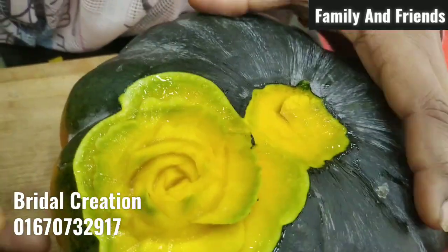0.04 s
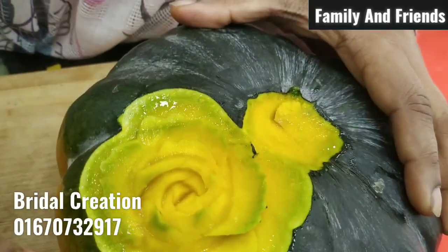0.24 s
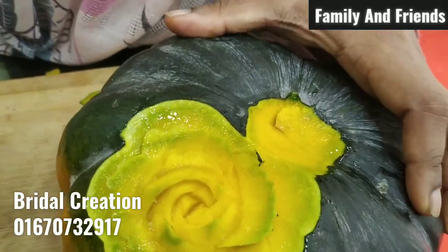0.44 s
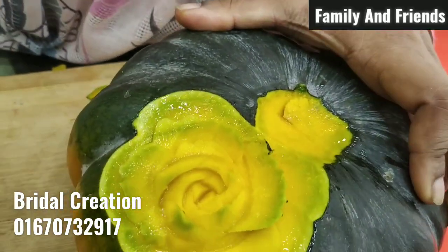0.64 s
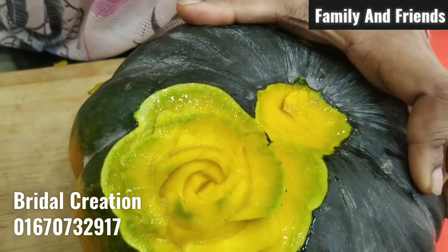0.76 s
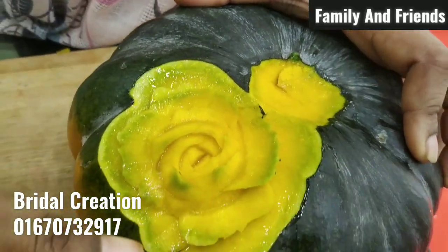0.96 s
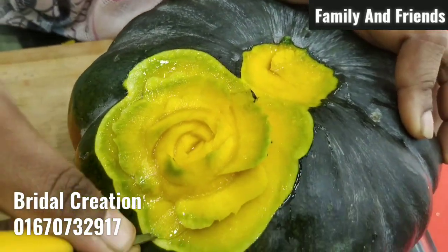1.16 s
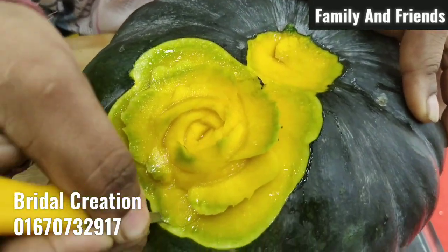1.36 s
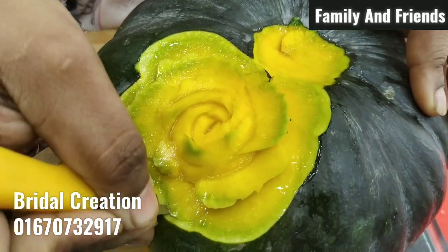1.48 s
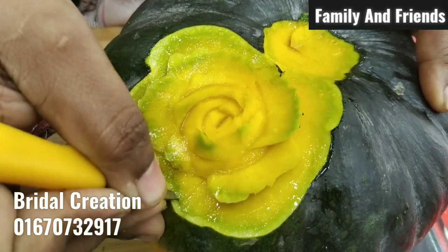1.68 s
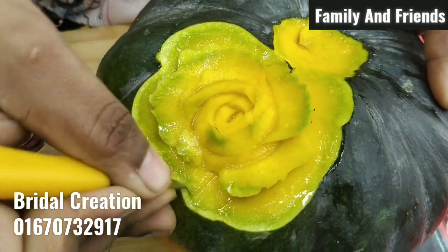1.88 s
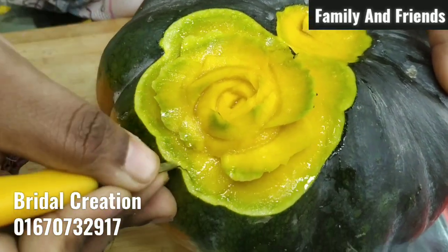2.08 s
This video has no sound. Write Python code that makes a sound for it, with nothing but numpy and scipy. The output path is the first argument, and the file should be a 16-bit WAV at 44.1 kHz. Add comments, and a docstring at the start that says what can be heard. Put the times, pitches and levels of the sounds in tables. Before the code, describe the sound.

A small knife carves a pumpkin indoors, close to the microphone. The rind first swishes and judders as it is turned, then crisp cutting ticks come quickly and slow down, ending with dull bumps and knocks on a wooden board.

```python
"""A small knife carves a pumpkin on a wooden board indoors, close to a hand-held stereo microphone.
Soft room noise, faint hum and left-side handling rumble run throughout.
First the fruit is turned: low stick-slip judder, dry swish of the rind.
From 0.64 s, crisp ticks, each a few ms of crackle, quick at first, then slowing.
From 1.4 s, as the knife hand goes in: dull bumps on the left, then woody knocks and three last ticks."""
import sys
import numpy as np
from scipy import signal
from scipy.fft import rfft, irfft, next_fast_len
from scipy.io import wavfile

SR = 44100
rng = np.random.default_rng(int(sys.argv[2]) if len(sys.argv) > 2 else 0)


def to_wav(sig):
    """Store sig (one row per channel, or 1-D mono) as 16-bit WAV at the path in sys.argv[1].

    Samples outside -1..1 are clipped; the rate is SR.
    """
    pcm = np.clip(np.atleast_2d(sig), -1, 1) * 32767
    pcm = np.round(pcm).astype(np.int16)
    wavfile.write(sys.argv[1], SR, pcm.T)  # frames by channels


N = 93315
T = np.arange(N) / SR
FFT_SIZE, TICK_SAMPLES = 2 * next_fast_len(N // 2 + 4096), 2048

ROOM_NOISE_EQ = [(20, -19), (40, -6.5), (65, 5), (115, -8.5), (155, -7), (195, -16.5), (280, -14),
                 (385, -17.5), (480, -22), (750, -25), (1200, -31), (2200, -31.5), (4000, -34),
                 (7000, -40.5), (15500, -42)]  # background spectrum: f/Hz, gain/dB
ROOM_COHERENCE = [(50, 0.027), (130, 0.64), (300, 0.93), (650, 0.51), (1400, 0), (8000, 0)]  # background, left to right: f/Hz, correlation
HUM_TONES = [(155, -60.5), (229, -71.5), (382, -68)]  # room hum: f/Hz, level/dB
RUMBLE_LEVEL = [(0, -41.5), (.25, -32.5), (.6, -36.5), (.8, -38), (.92, -29.5), (1.1, -36.5), (1.35, -34.5),
                (1.55, -33.5), (1.75, -36), (1.8, -24.5), (2.04, -26), (2.12, -40)]  # handling rumble: t/s, level/dB
RUMBLE_EQ = [(15, 1.5), (33, 2), (60, -8.5), (100, -19), (160, -28.5), (300, -38), (700, -51),
             (2000, -64.5)]  # rumble spectrum: f/Hz, gain/dB

SLIP_RUNS = [(.045, 0.043, 82, -36), (0.272, 0.207, 77.5, -39.5)]  # judders of the fruit: t/s, length/s, slip rate/Hz, level/dB
SLIP_EQ = [(30, -17), (78, 1.5), (155, -13), (235, -19.5), (380, -21.5), (700, -31), (1500, -51)]  # spectrum of one slip: f/Hz, gain/dB
RIND_SWISHES = [(.067, 0.0035, 0.0033, 0.64, -45), (.094, 0.0057, 0.015, 0.55, -36)]  # opening swishes: t/s, attack/s, hold/s, t60/s, level/dB
SWISH_EQ = [(300, -17), (600, 2.5), (1150, -8.5), (1500, 1), (2200, -1), (3100, -5), (5000, 1), (8000, 1.5),
            (11000, 2.5), (16000, 1.5)]  # swish spectrum: f/Hz, gain/dB
RUB_LEVEL = [(0, -76), (.06, -73), (.16, -72), (.22, -65), (.312, -59), (.33, -58.5), (.38, -50),
             (.45, -54.5), (.5, -51), (.58, -64), (.63, -63), (.9, -64), (1.0, -70), (1.1, -66.5),
             (1.35, -70.5), (2.12, -60.5)]  # rind sliding under the hands: t/s, level/dB
RUB_CATCHES = [(.319, -46), (0.496, -60)]  # rub catching afresh: t/s, level/dB
RUB_EQ = [(500, -40), (1300, 5), (2200, 2), (3300, -13), (5000, 11.5), (6500, 7), (8500, 12), (12000, 8.5),
          (16000, 6.5)]  # rub spectrum: f/Hz, gain/dB
BRUSH_LEVEL = [(0, -87), (.6, -61), (.72, -72), (.95, -58.5), (1.04, -60), (1.12, -69), (1.17, -57),
               (1.28, -56.5), (1.33, -80), (2.12, -69)]  # thin high brushing: t/s, level/dB
BRUSH_EQ = [(4000, -20), (6500, -30), (9000, 2.5), (12500, 2), (16000, -3.5)]  # brushing spectrum: f/Hz, gain/dB

# ticks: t/s, length/s, relative level/dB, ring f/Hz, then gains: ring/dB, treble/dB, left/dB, snap/dB, body/dB
KNIFE_TICKS = [(0.6397, 0.01, -52, 5400, -6, 8, -7, -15, -32),
               (0.6772, 0.0073, -38, 5440, -5, -2, -2, -5, -22),
               (0.7154, 0.0049, -31.5, 6000, 3, -6.5, -0.5, -0.5, -25),
               (.7680, 0.0057, -30.5, 6140, 4, -2.5, -1.5, 1.5, -12),
               (0.8371, 0.0044, -25, 6400, -0.5, -5.5, 0, -6, -13),
               (0.9199, 0.0051, -28, 6660, 0, 1, -2, 0.5, -11.5),
               (1.0256, 0.0054, -25, 6660, -8, -2.5, -2.5, -7, -16),
               (1.2838, 0.0033, -32, 3980, -4.5, 4, 2, -20, -19),
               (1.5423, 0.0062, -29, 4020, -9.5, 0, -2.5, -5, -17),
               (1.8333, .0040, -29.5, 4300, -19, 2.5, 4, -1, -12.5),
               (1.9000, 0.0037, -30, 4970, -5, 0.5, 0, -5.5, -19),
               (1.944, 0.0056, -30.5, 4520, -2.5, -2, 1.5, -15, -13)]
HOLLOW_MODES = [(1724, -12, .016), (1830, -36, 0.0023)]  # hollow modes struck by each snap: f/Hz, gain/dB, t60/s
FRUIT_MODES = [(285, -4.5, 0.0087), (464, -5.5, 0.022), (890, -25, 0.0034)]  # low body of the fruit, same snap: f/Hz, gain/dB, t60/s
CRACKLE_EQ = [(300, -18), (1000, -11), (1800, -18.5), (2800, -18.5), (3300, -12), (3950, -3.5), (5000, -3),
              (7000, 0), (9000, -3.5), (11000, 0), (15500, -2)]  # crackle spectrum: f/Hz, gain/dB
TAIL_EQ = [(400, -4), (1800, 4), (3400, -10), (4300, 7.5), (5500, -1), (8000, -1.5), (15000, -2)]  # room tail spectrum: f/Hz, gain/dB
LEFT_EQ = [(500, 0), (1800, -1), (3000, 1), (4500, 1.5), (6300, -1), (8000, -5.5), (10500, -13.5),
           (13000, -18), (15500, -23)]  # dulled treble at the left microphone: f/Hz, gain/dB

HAND_BUMPS = [(1.403, -16.5, 57.4), (1.435, -20.5, 92), (1.782, -14.5, 56), (1.804, -17.5, 44),
              (1.889, -12, 41), (1.955, -13, 53.7), (2.009, -13, 48), (2.066, -20.5, 67.5)]  # handling bumps: t/s, envelope peak/dB, f/Hz
BOARD_KNOCKS = [(1.833, -45), (1.875, -39), (1.883, -47), (1.950, -42), (1.973, -47.5), (2.005, -49)]  # fruit on the board: t/s, level/dB
KNOCK_EQ = [(80, 2), (170, 4.5), (400, -6), (700, -10.5), (1100, -23), (3000, -38), (8000, -43)]  # knock spectrum: f/Hz, gain/dB


def from_db(db):
    """dB to gain."""
    return 10 ** (np.asarray(db) / 20)


def unit_rms(x):
    """Scale to rms 1."""
    return x / np.sqrt(np.mean(x ** 2) + 1e-20)


def level(points):
    """Gain over time from (t/s, level/dB)."""
    return from_db(np.interp(T, *np.transpose(points)))


def at_bins(points):
    """(f/Hz, value) at each FFT bin, log-f interpolation."""
    hz, value = np.transpose(points)
    return np.interp(np.log(np.fft.rfftfreq(FFT_SIZE, 1 / SR) + 1), np.log(hz), value)


def colour(x, eq):
    """Minimum-phase filter from (f/Hz, gain/dB)."""
    cepstrum = irfft(np.log(from_db(at_bins(eq))))
    cepstrum[1:FFT_SIZE // 2] *= 2
    cepstrum[FFT_SIZE // 2 + 1:] = 0
    return irfft(rfft(x, FFT_SIZE) * np.exp(rfft(cepstrum)))[..., :N]


def noise(eq, channels=2):
    """Coloured noise, rms 1."""
    return unit_rms(colour(rng.standard_normal((channels, N)), eq))


def butter(x, hz, kind, order=2):
    """Butterworth filter."""
    return signal.sosfilt(signal.butter(order, hz, kind, fs=SR, output="sos"), x + 1e-18)


def resonance(x, hz, width_hz):
    """Band-pass, unit peak gain."""
    return butter(x, [hz - width_hz / 2, hz + width_hz / 2], "band")


def wander(cutoff_hz):
    """Low-passed noise, rms 1."""
    return unit_rms(butter(rng.standard_normal(N), cutoff_hz, "low"))


def envelope(start_s, attack_s, hold_s, t60_s):
    """Linear attack, hold, exponential release."""
    age_s = T - start_s
    release_db = -60 * np.clip((age_s - attack_s - hold_s) / t60_s, 0, 2)
    return np.clip(age_s / attack_s, 0, 1) * from_db(release_db)


def pan_left(x, right_db):
    """Stereo, right side attenuated."""
    return x * np.array([[1], [from_db(right_db)]])


def room_noise():
    """Steady background, most coherent near 300 Hz."""
    mid, side = rfft(noise(ROOM_NOISE_EQ), FFT_SIZE)
    coherence = at_bins(ROOM_COHERENCE)
    spectra = np.sqrt(1 + coherence) * mid + np.sqrt(1 - coherence) * side * [[1], [-1]]
    return from_db(-48) * pan_left(unit_rms(irfft(spectra)[:, :N]), right_db=-.5)


def hum():
    """Three narrow noise bands: faint wavering tones, mono."""
    white = rng.standard_normal(N + SR)  # 1 s extra for settling
    return sum(from_db(db) * unit_rms(resonance(white, hz, width_hz=8.1)[SR:]) for hz, db in HUM_TONES)


def rumble():
    """Uneven handling noise on the left microphone."""
    return pan_left(level(RUMBLE_LEVEL) * noise(RUMBLE_EQ, channels=1), right_db=-28)


def judder():
    """Stick-slip: nearly regular slips shake the turning fruit."""
    out, fade_s = np.zeros(N), .029
    rate_factor = 1 + .032 * wander(cutoff_hz=22)
    for start_s, length_s, rate_hz, db in SLIP_RUNS:
        slip_count = np.floor(np.cumsum(rate_hz * rate_factor) / SR)
        slips = np.diff(slip_count, prepend=0)
        gate = np.clip(np.minimum(T - start_s, start_s + length_s - T) / fade_s + .5, 0, 1)
        out += from_db(db) * gate * unit_rms(colour(slips - slips.mean(), SLIP_EQ))
    return pan_left(out, right_db=-23)


def rubbing():
    """Grainy rind friction: swishes, a rub that catches twice, thin brushing."""
    grain = from_db(1.5 * wander(cutoff_hz=370))
    swish = sum(from_db(db) * envelope(*timing_s) for *timing_s, db in RIND_SWISHES)
    catches = sum(from_db(db) * envelope(start_s, attack_s=.003, hold_s=.006, t60_s=.14)
                  for start_s, db in RUB_CATCHES)
    rub = level(RUB_LEVEL) + catches
    return grain * (swish * noise(SWISH_EQ) + rub * noise(RUB_EQ) + level(BRUSH_LEVEL) * noise(BRUSH_EQ))


def strike(modes):
    """Decaying sines from one blow."""
    age_s = T[:TICK_SAMPLES]
    return sum(from_db(db - 60 * age_s / t60_s) * np.sin(2 * np.pi * hz * age_s) for hz, db, t60_s in modes)


def ticks():
    """Per tick: a snap and a dense run of tiny cracks with its own ring. Arrives later on the left."""
    cracks_per_s, coherence, boost_db = 18000, .55, 5
    attack_s, release_s, left_lag_s = .0007, .001, .00048
    age_s = T[:TICK_SAMPLES]
    attack = np.minimum(age_s / attack_s, 1) ** 2
    snap, body = strike(HOLLOW_MODES), strike(FRUIT_MODES)
    crackle, rings = np.zeros((2, 2, N))
    for start_s, length_s, db, ring_hz, ring_db, treble_db, left_db, snap_db, body_db in KNIFE_TICKS:
        signs = rng.choice([-1, 1], (3, TICK_SAMPLES))  # left, right, common
        cracks = signs * (rng.random(signs.shape) < cracks_per_s / SR)
        cracks = unit_rms(np.sqrt(coherence) * cracks[2] + np.sqrt(1 - coherence) * cracks[:2])
        release = np.exp(-np.maximum(age_s - length_s + attack_s, 0) / release_s)
        gain = from_db([[db + left_db + boost_db], [db + boost_db]])
        burst = gain * cracks * attack * release
        treble = butter(burst, hz=8460, kind="high", order=1)
        span = slice(int(start_s * SR), int(start_s * SR) + TICK_SAMPLES)
        crackle[:, span] += burst + (from_db(treble_db) - 1) * treble
        rings[:, span] += from_db(ring_db) * resonance(burst, ring_hz, width_hz=750)
        rings[:, span] += gain * (from_db(snap_db) * snap + from_db(body_db) * body)
    left, right = colour(crackle, CRACKLE_EQ) + rings
    return np.array([np.pad(left, (round(left_lag_s * SR), 0))[:N], right])


def room_tail(x):
    """Short diffuse reverberation, independent per side."""
    decay = envelope(start_s=.007, attack_s=.001, hold_s=0, t60_s=.15)
    response = colour(unit_rms(rng.standard_normal((2, N)) * decay), TAIL_EQ) / np.sqrt(N)
    return from_db(-17.5) * signal.fftconvolve(x, response, axes=1)[:, :N]


def bumps():
    """Soft handling pushes that swing about once and die."""
    out, rise_cycles = np.zeros(N), .41
    for start_s, db, hz in HAND_BUMPS:
        cycles = np.maximum(T - start_s, 0) * hz
        swell = cycles / rise_cycles
        out -= from_db(db) * swell * np.exp(1 - swell) * np.sin(2 * np.pi * cycles)
    return pan_left(out, right_db=-28)


def knocks():
    """Fruit knocks on the board: short dull noise bursts."""
    blows = sum(from_db(db) * envelope(start_s, attack_s=.0023, hold_s=.006, t60_s=.11)
                for start_s, db in BOARD_KNOCKS)
    return pan_left(blows * noise(KNOCK_EQ, channels=1), right_db=-14)


def scene():
    """Ticks, their tail and rubbing, dulled on the left; plus low sounds and background."""
    direct = ticks()
    left, right = direct + room_tail(direct) + rubbing()
    crisp = np.array([colour(left, LEFT_EQ), right])
    return crisp + judder() + rumble() + bumps() + knocks() + room_noise() + hum()


def record(dry):
    """Steep elliptic low-pass, 15.9 kHz."""
    return signal.sosfilt(signal.ellip(10, .2, 80, 15900, fs=SR, output="sos"), dry)


dry = scene()
out = record(dry)
to_wav(out)
```